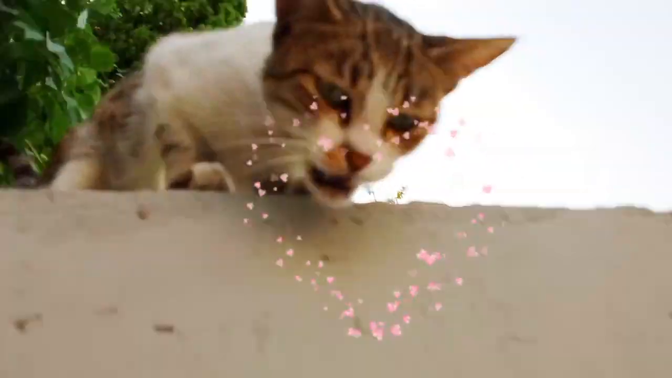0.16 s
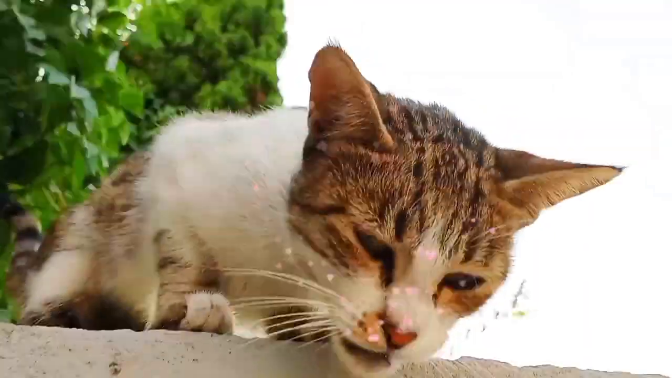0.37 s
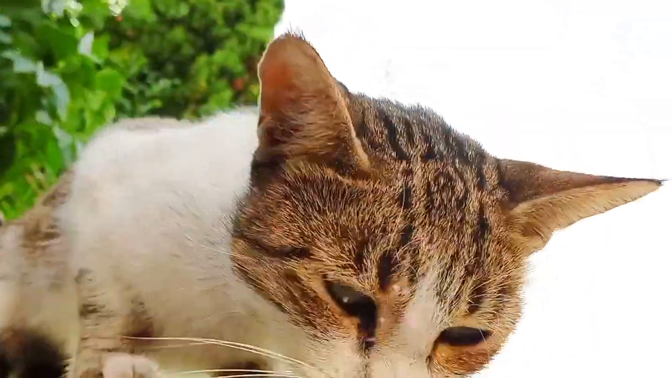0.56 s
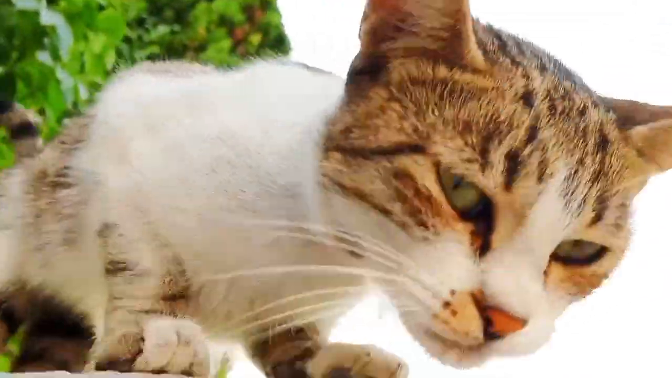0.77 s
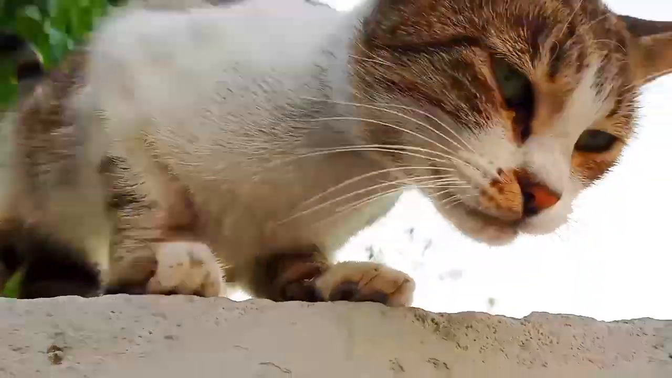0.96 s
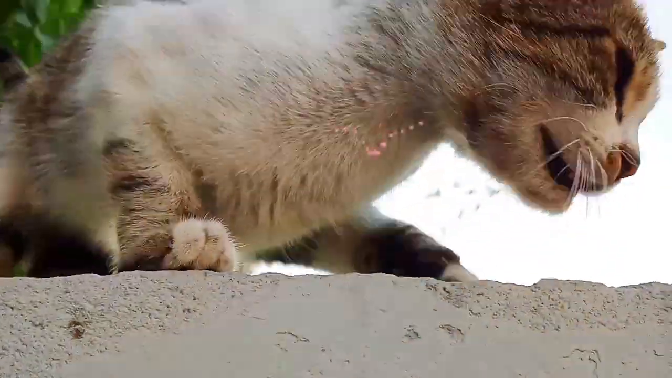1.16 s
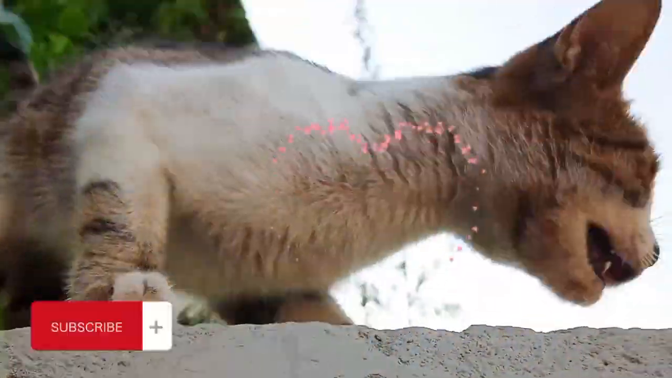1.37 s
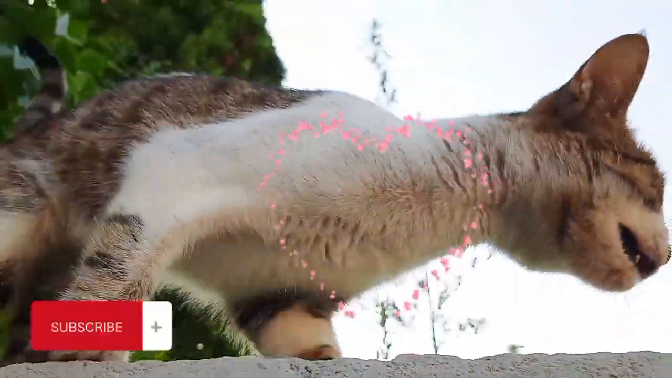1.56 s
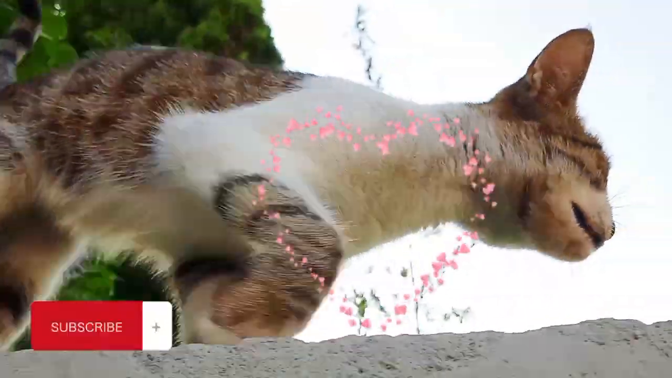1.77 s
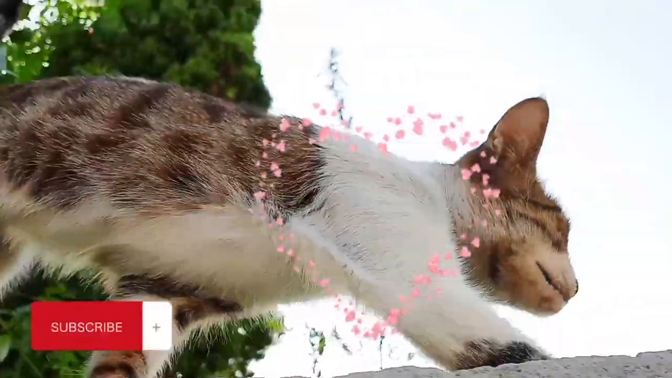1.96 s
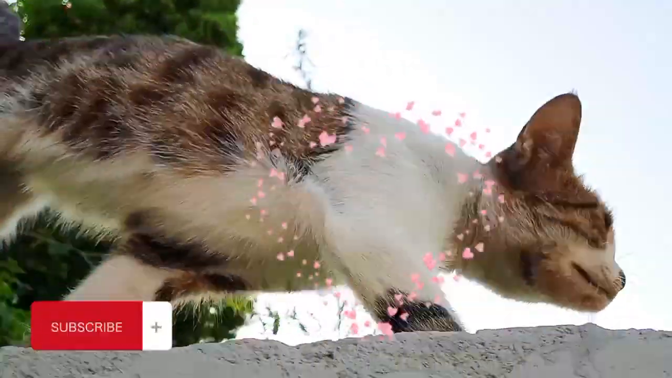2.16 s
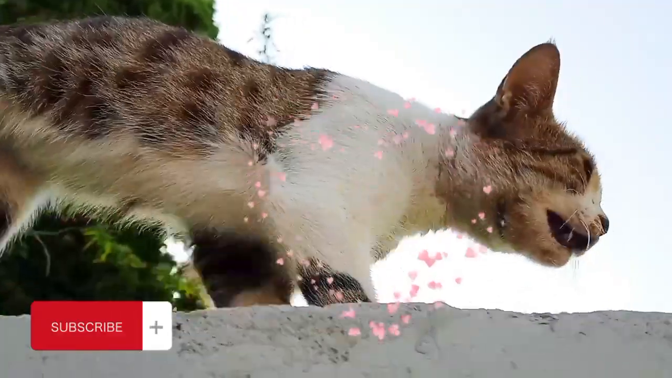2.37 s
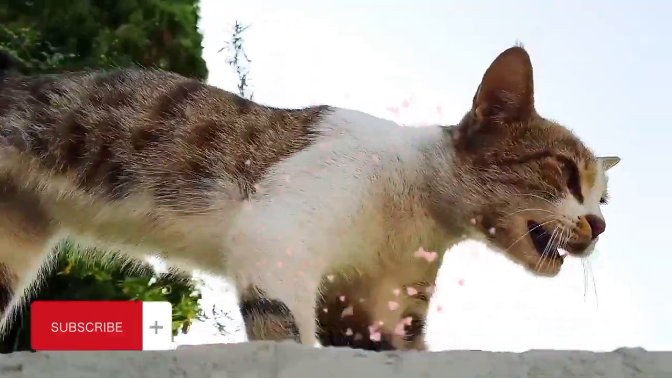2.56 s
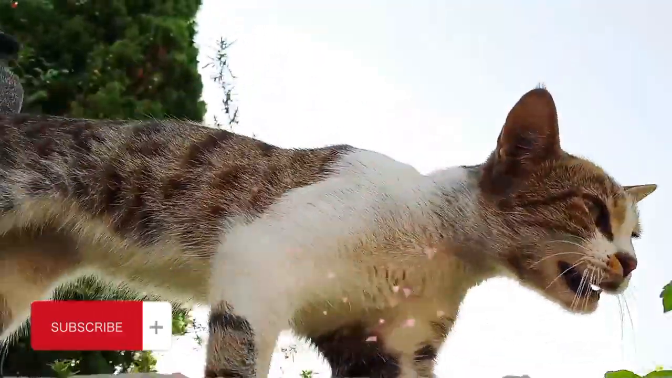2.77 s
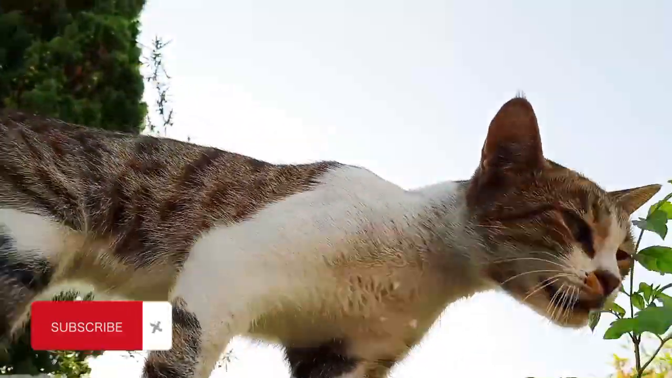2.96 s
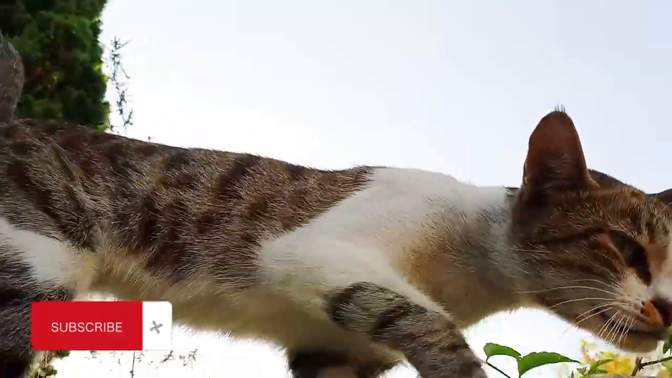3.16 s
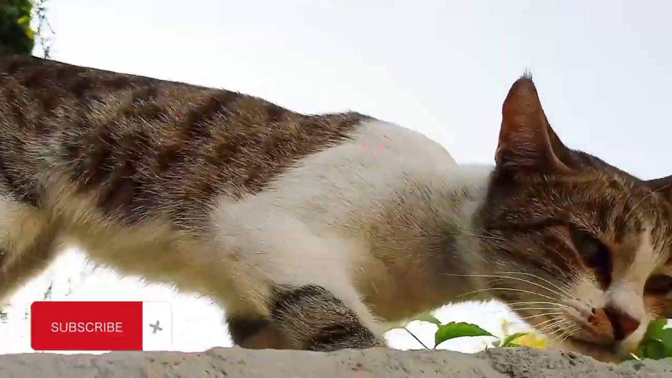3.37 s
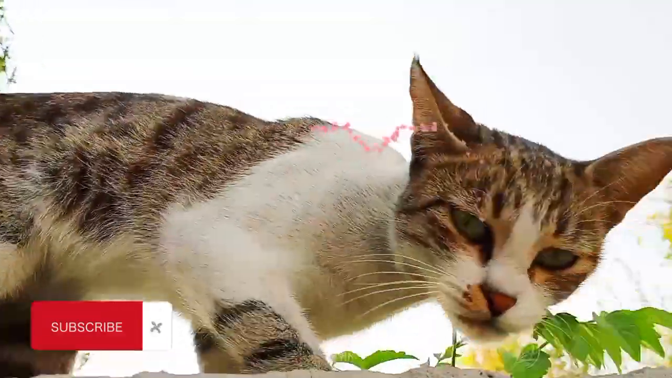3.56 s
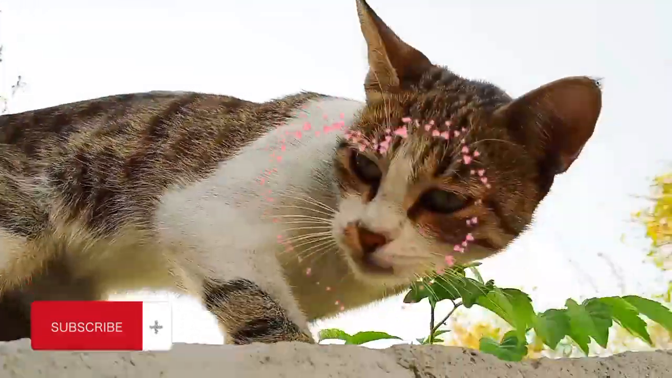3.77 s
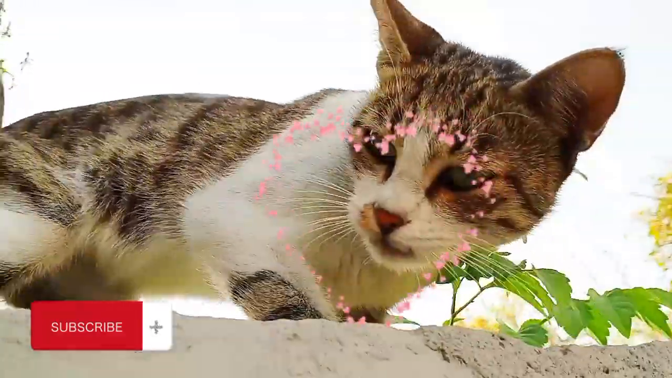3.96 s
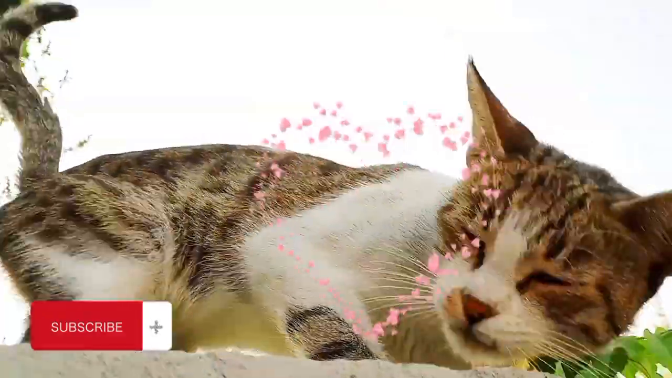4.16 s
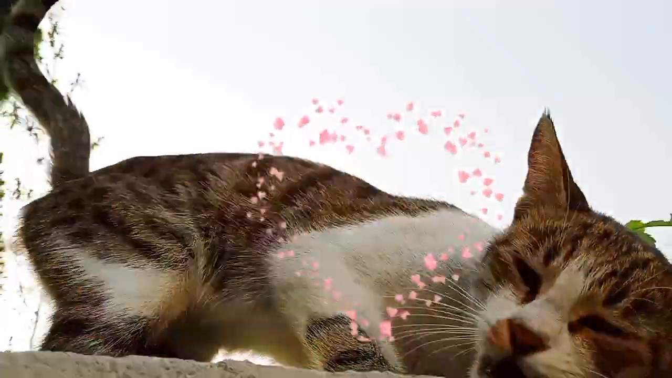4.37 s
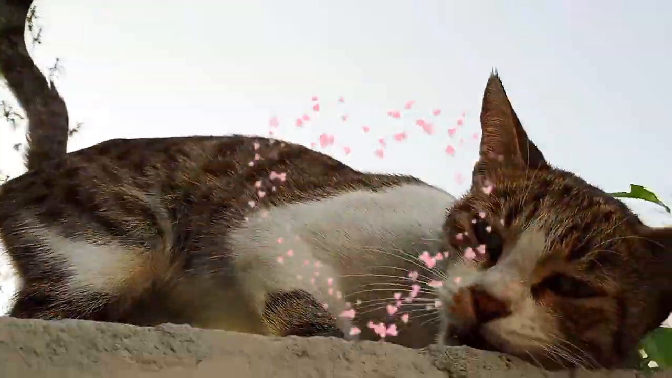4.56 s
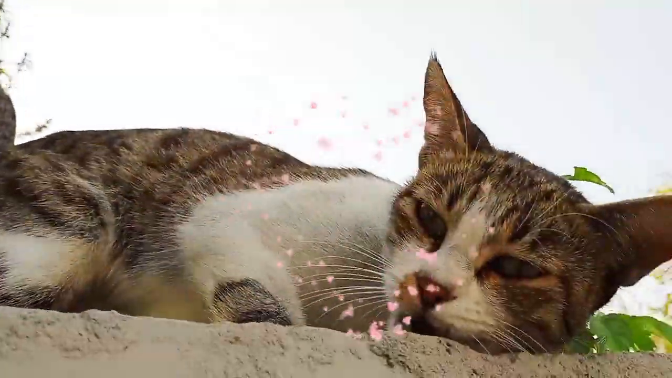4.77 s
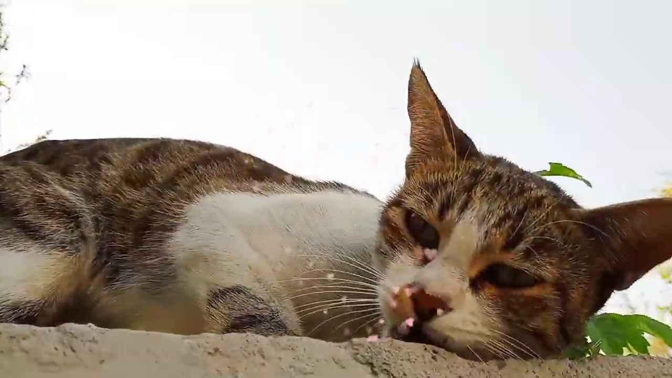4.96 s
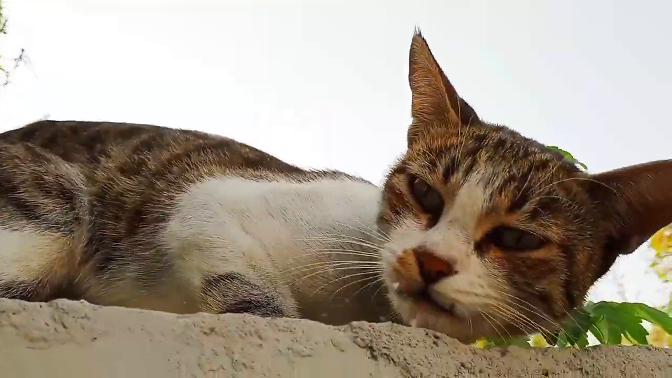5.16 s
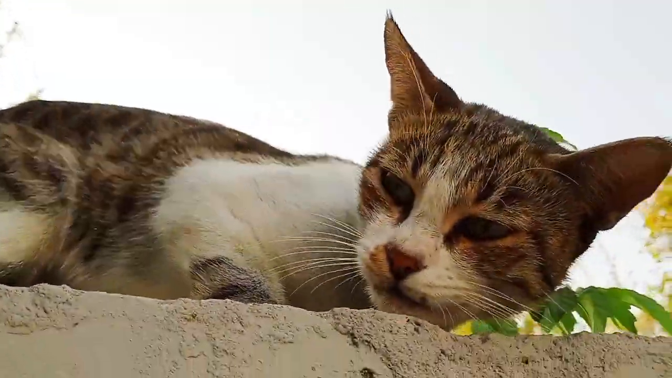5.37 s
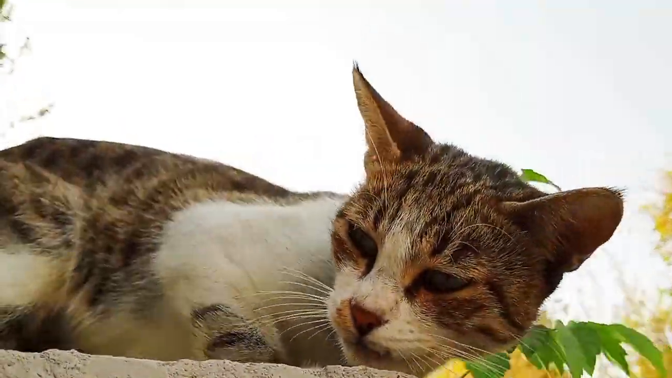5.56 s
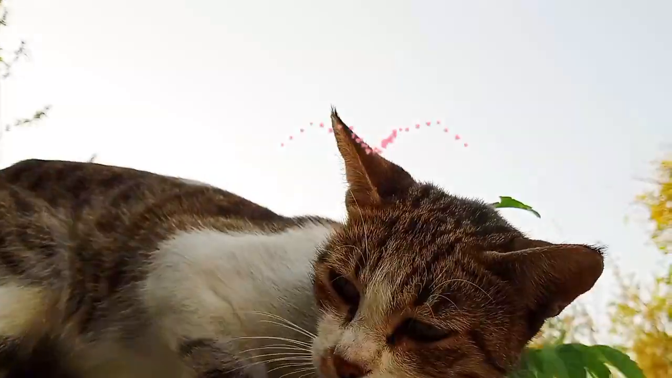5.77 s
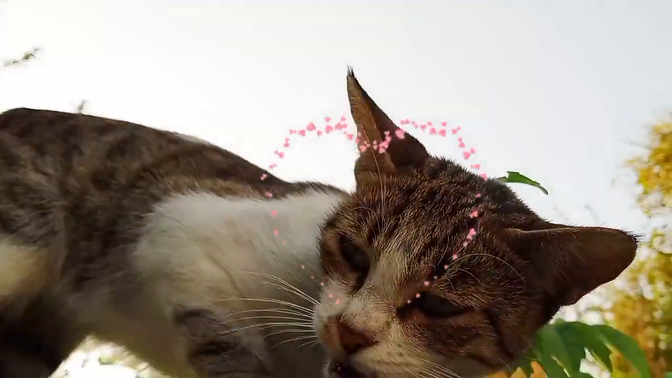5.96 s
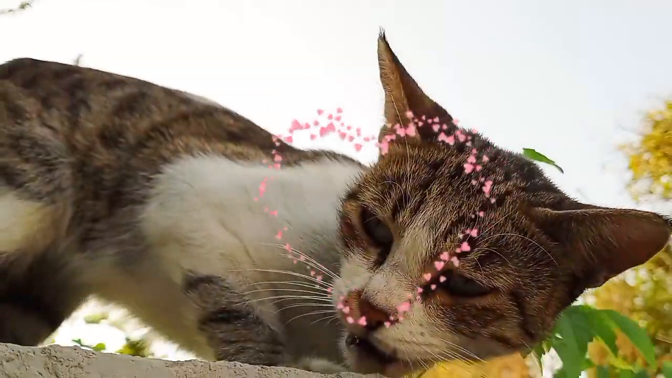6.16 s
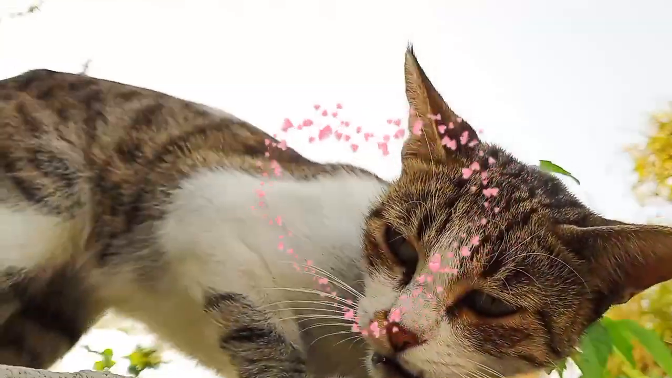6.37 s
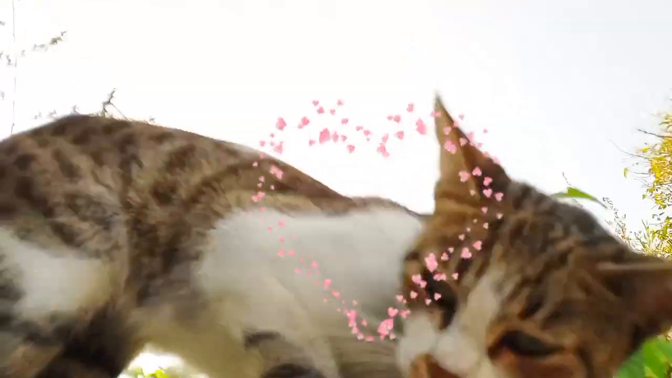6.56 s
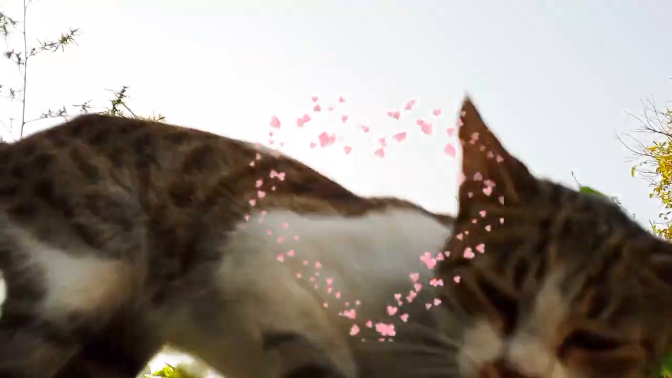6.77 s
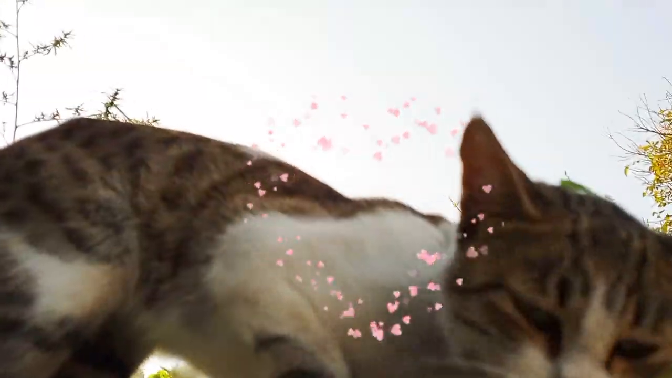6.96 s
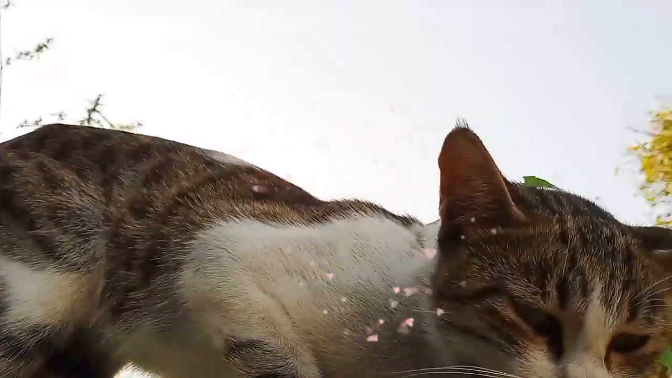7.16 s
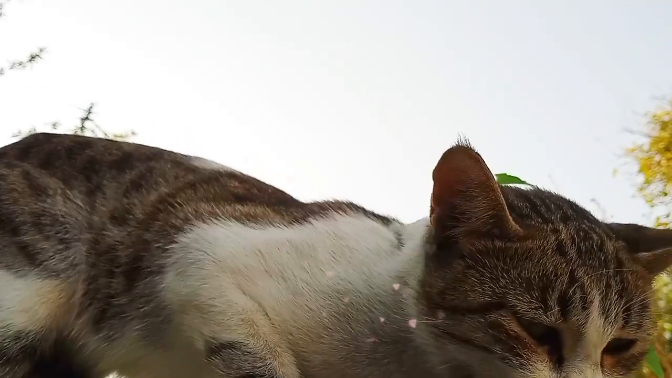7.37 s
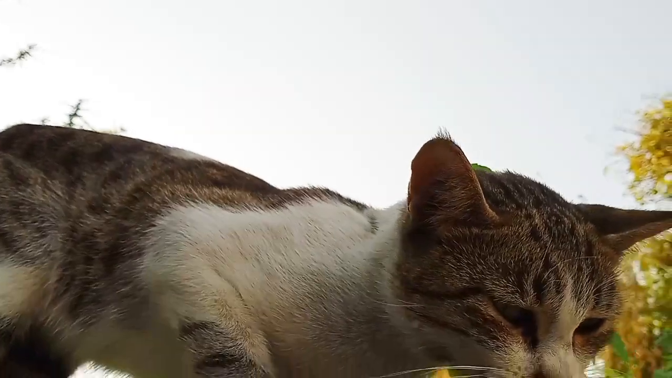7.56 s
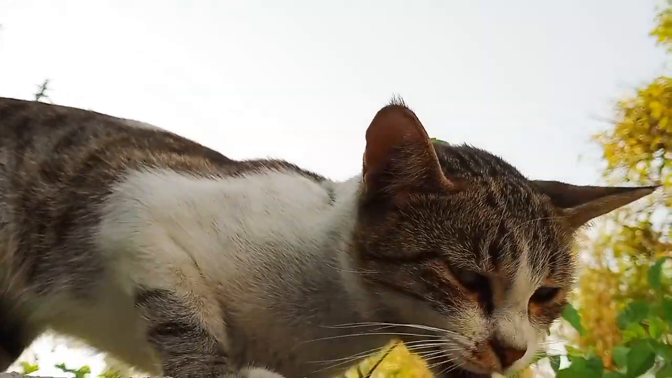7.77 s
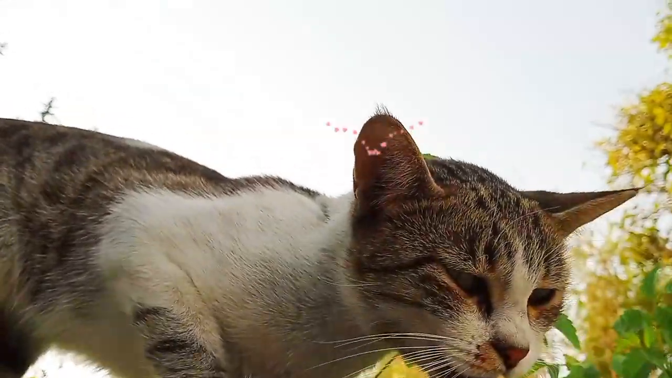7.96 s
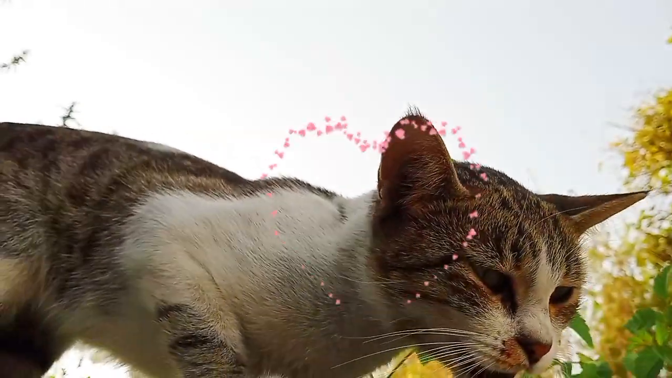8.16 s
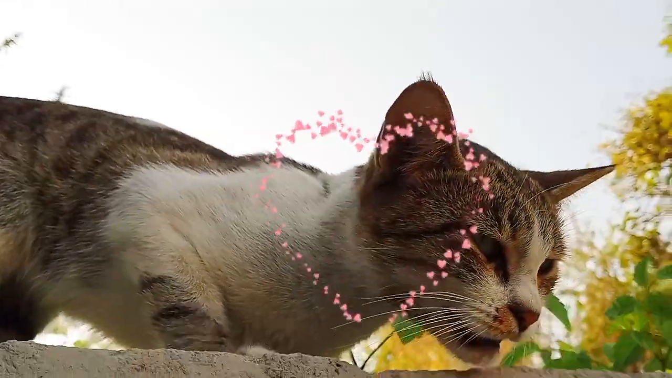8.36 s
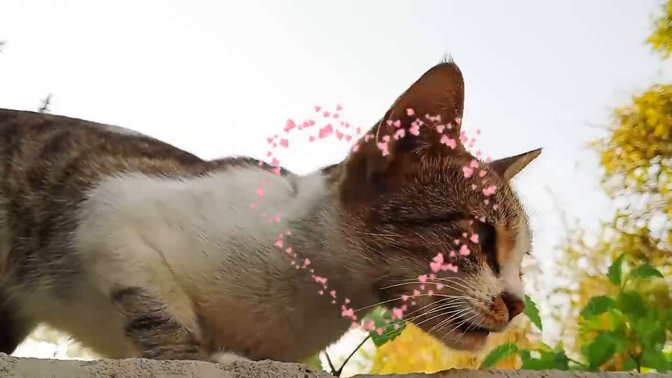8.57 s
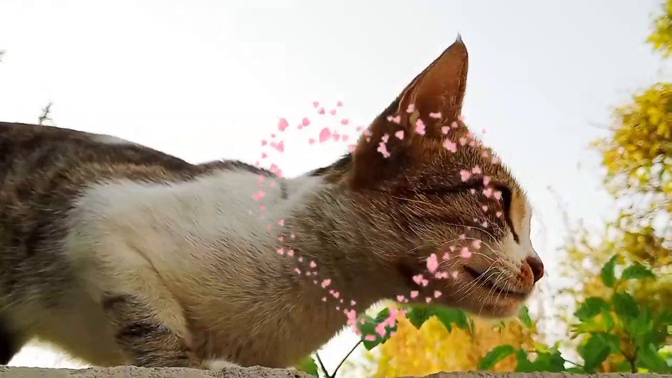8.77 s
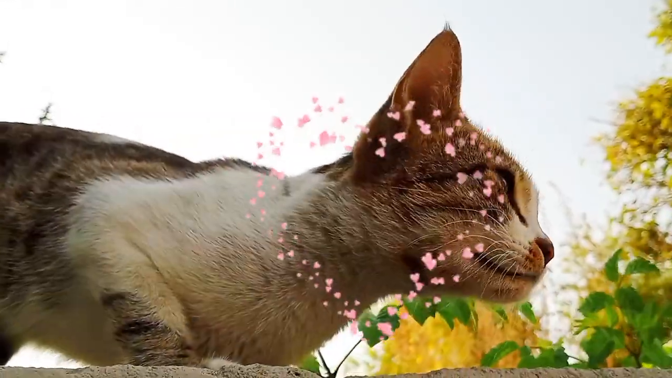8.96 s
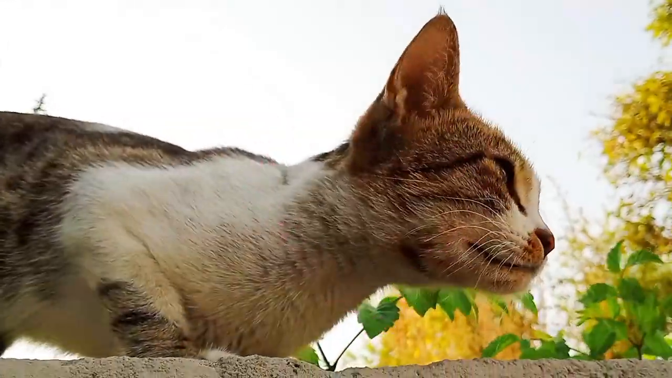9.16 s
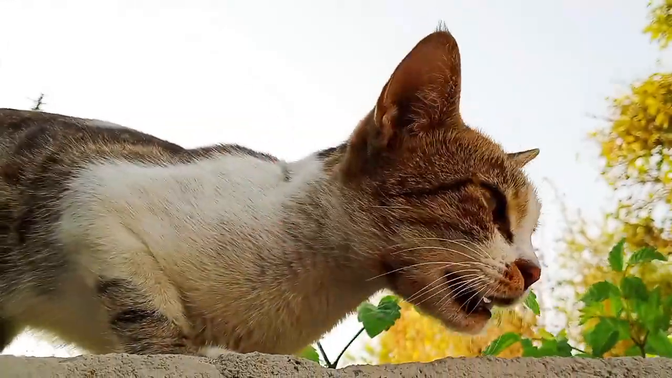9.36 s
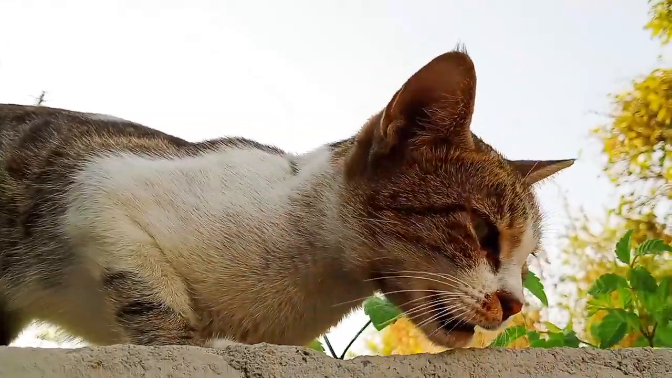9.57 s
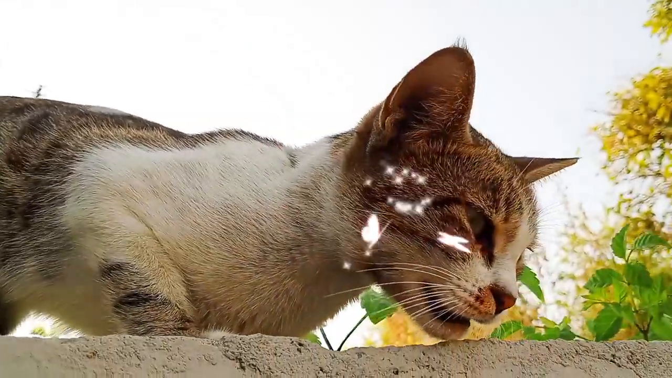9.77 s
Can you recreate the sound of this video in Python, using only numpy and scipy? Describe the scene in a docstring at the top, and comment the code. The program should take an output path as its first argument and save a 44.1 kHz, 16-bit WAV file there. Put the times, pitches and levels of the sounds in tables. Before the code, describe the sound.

A close cat meows seven times outdoors, each whine sagging in pitch, with paw knocks on a wall and a crow cawing behind.

```python
"""Cat and crow in a yard

A near cat meows seven times: a sum of partials shaped by a moving mouth resonance, sagging in pitch and
ending in a small grunt or rasp. A crow caws once faintly and twice loudly: rough pulses through a resonant throat.
Paws knock, tick and scuff on a wall: damped pushes and bursts of filtered noise. A small bird whistles
two falling, nearly pure notes. Filtered noise gives a steady outdoor hiss and a faint hum;
scattered reflections give a light echo."""
import sys
import numpy as np
from scipy import signal
from scipy.fft import rfft, irfft
from scipy.io import wavfile
from scipy.ndimage import uniform_filter1d, minimum_filter1d, map_coordinates

SR = 44100
rng = np.random.default_rng(int(sys.argv[2]) if len(sys.argv) > 2 else 0)


def waveform_to_disk(signal):
    """Save audio, clipped to [-1, 1], as 16-bit WAV at the path in sys.argv[1]."""
    frames = np.transpose(np.atleast_2d(signal))
    scaled = np.clip(frames, -1, 1) * 32767
    samples = np.round(scaled).astype(np.int16)
    wavfile.write(sys.argv[1], SR, samples)


N = 433503

# spectrum of the outdoor air: (frequency [Hz], relative level [dB])
AIR_SPECTRUM = [(15, -55), (25, -25), (94, -7), (148, -9.5), (205, -4), (269, -8), (352, -10.5), (557, -15),
                (604, -14), (729, -14.5), (791, -15.5), (1150, -18.5), (1470, -18.5), (2260, -15),
                (2890, -11.5), (3220, -23.5), (4950, -29), (6310, -11.5), (7220, -15.5), (8270, -46),
                (15800, -34.5)]
# narrow bands in the background: (frequency [Hz], filter width [Hz], relative level [dB])
HUM_BANDS = [(214.6, 8.6, 2), (242.9, 30, -6), (802, 16, -8), (2932, 15.7, -5.5)]

# gesture of each meow; the mouth resonance sinks as the mouth closes:
# (time [s], base pitch [Hz], effort [dB], mouth resonance [Hz], treble level [dB])
MEOW_1 = [(0.0, 575, -25, 1990, 16.5), (0.068, 579, -25, 2020, 12), (0.2, 585, -22.5, 1970, 5.5),
          (0.257, 586, -22.5, 1840, 13), (0.347, 581.5, -20, 1865, 14), (0.421, 569, -29, 1080, 2),
          (0.46, 535, -25, 955, -15), (0.503, 468, -36.5, 1090, -1)]
MEOW_2 = [(1.189, 617, -37, 1660, -22), (1.215, 589, -30, 2120, -11), (1.245, 605, -28.5, 2040, -2),
          (1.343, 610.3, -24.5, 2430, -6.5), (1.382, 582.6, -27.5, 2495, 4.5),
          (1.436, 600.5, -23.5, 2460, -0.5), (1.582, 638, -30, 2000, -7), (1.647, 640, -31.5, 1970, -9),
          (1.758, 595, -32.5, 1640, -13), (1.824, 567, -37, 1010, -4)]
MEOW_3 = [(2.34, 598, -36, 1880, 0), (2.408, 584.4, -33.3, 2210, 7), (2.564, 564, -32, 2146, 15.5),
          (2.607, 571, -31, 2206, 15.5), (2.689, 592, -27.5, 2190, 5), (2.784, 571.4, -29.5, 2160, 1.5),
          (2.813, 578, -34.5, 1210, 10), (2.958, 560, -34.5, 1165, 8), (3.021, 486, -40, 920, -16)]
MEOW_4 = [(4.283, 553, -38, 1100, -20), (4.305, 562, -29.5, 1450, 14), (4.339, 591, -32, 2060, 0),
          (4.439, 601.7, -24.5, 1950, -1), (4.534, 585.5, -24.5, 1910, 6.5), (4.64, 602.3, -22, 1810, -2.5),
          (4.68, 589, -24.5, 1660, -4.5), (4.78, 595, -26, 1490, -12), (4.964, 537, -29, 1160, -2),
          (5.018, 511, -37.5, 1310, 4)]
MEOW_5 = [(5.898, 633, -24, 1810, -7), (5.953, 598, -23.0, 2060, 0), (6.032, 631.4, -26.5, 1965, -0.5),
          (6.138, 606, -23.0, 1810, -10), (6.208, 594.4, -26.5, 1704, -22.5),
          (6.517, 579.3, -28, 1350, -14), (6.763, 511, -32, 950, -7), (7.003, 491, -30, 960, -5.5),
          (7.063, 500, -35, 850, 2)]
MEOW_6 = [(7.801, 600.5, -25, 1890, -6), (7.888, 584.4, -29, 1620, 14), (8.044, 595.8, -23, 1810, 3.5),
          (8.077, 597.3, -17, 1770, 1), (8.098, 582.4, -20.5, 1770, 7.5), (8.191, 589.3, -26, 1740, 2.5),
          (8.256, 586.5, -25, 1580, -3.5), (8.365, 574.7, -28, 1490, 7), (8.504, 543.5, -29, 1260, -3),
          (8.654, 494.5, -37, 920, 2)]
MEOW_7 = [(9.337, 639, -24, 2040, -12), (9.4, 578, -29, 1660, 6), (9.527, 560.7, -26.5, 1770, 8),
          (9.636, 554, -25, 1685, 1.5), (9.701, 551.7, -21.5, 1560, 1), (9.763, 552, -25.5, 1160, 2),
          (9.83, 538, -27.5, 1113, 5)]
# manner of each meow: (opening squeak [share of pitch], final drop [share of pitch],
# open-mouth resonance [dB], fifth partial [dB], brightness [dB])
MEOW_MANNERS = [(0.04, 0.315, 17.5, -10, -16), (0.114, .33, 18.8, 1.5, 0), (0.45, 0.315, 15.4, -6, -11),
                (.06, .38, 17.3, -8.5, -6.5), (0.1026, 0.33, 18.6, 2, -3.5), (0.49, .33, 21.9, -6, -12),
                (0.27, 0, 17.1, -3.5, -6.5)]
# fixed colour of the cat's voice: (frequency [Hz], relative level [dB])
VOICE_COLOUR = [(400, 16.7), (480, 7.4), (600, -4.5), (1150, -.3), (1750, -8.2), (2400, -8), (2950, -19.5),
                (3500, -17), (4100, -20), (4700, -23), (5900, -22), (7000, -26), (8800, -56), (10400, -37),
                (12000, -45)]
# part of the treble level given to a partial: (frequency [Hz], share [0-1])
TREBLE_SHARE = [(1200, 0), (3500, 1)]
# part of the brightness given to a partial: (frequency [Hz], share [0-1])
BRIGHT_SHARE = [(2400, 0), (3500, 1)]
# change of the fundamental, which thins in the second and last meow: (time [s], level [dB])
FUNDAMENTAL_THINNING = [(1.51, 1), (1.555, -16), (1.65, -4), (1.83, 0), (1.9, 0.5), (9.33, 1), (9.45, -4.5),
                        (9.84, 1)]
# quavers of the voice: (middle [s], half length at 1/e [s], depth [share of pitch])
QUAVERS = [(1.26, 0.048, 0.026), (4.335, 0.03, 0.032), (4.92, 0.12, 0.021), (6.81, .09, 0.014)]
# instants when the voice cracks: (time [s], strength [0-1])
VOICE_CRACKS = [(2.352, 0.67), (4.662, 0.94), (6.19, 0.58), (8.191, 0.72)]

# paws landing on the wall: (time [s], level [dB] ahead of the envelopes)
PAW_KNOCKS = [(0.216, -21), (.341, -12), (0.817, -17.5), (1.012, -32), (2.698, -32), (3.129, -31.5)]
# spectrum of a knock: (frequency [Hz], relative level [dB])
KNOCK_SPECTRUM = [(35, -27), (60, 1), (526, 2.5), (835, -3), (1100, -13), (1600, 2), (5430, -24),
                  (6680, -22), (8420, -47), (15000, -26)]
# claws ticking on grit: (time [s], starting level [dB])
CLAW_TICKS = [(0.337, -23), (2.699, -44), (4.172, -44), (4.203, -38), (4.25, -42), (4.294, -35.5),
              (4.35, -48)]
# gritty scuffs: (time [s], length [s], level [dB], fine grit relative to that [dB])
PAW_SCUFFS = [(0.008, 0.24, -37, -3.5), (0.201, 0.24, -29.5, -5), (0.852, 0.18, -36.5, -15),
              (1.822, 0.39, -54, 3.5), (2.673, 0.076, -50, 3), (2.703, 0.0063, -17.5, -21)]
# resonances of a scuff: (frequency [Hz], filter width [Hz], relative level [dB])
SCRAPE_MODES = [(1486, 200, 6.5), (2300, 1440, 2)]
# resonances of fine grit: (frequency [Hz], filter width [Hz], relative level [dB])
GRIT_MODES = [(3800, 480, 9.5), (5570, 1300, 0), (11400, 1300, -4), (15100, 1500, -7)]

# rasps of air as a meow breaks off: (time [s], level [dB] ahead of the envelope)
RASPS = [(0.48, -21), (3.0, -36.5), (7.04, -24.5), (8.638, -24)]
# resonances of the nearly shut mouth: (frequency [Hz], filter width [Hz], relative level [dB])
SHUT_MOUTH_MODES = [(2560, 510, 0.5), (4550, 190, -4), (6330, 670, -0.5), (10630, 210, -12.5)]
# caws: (start [s], length [s], rise [s], top pitch [Hz], starting level [dB], base roughness [0-1])
CAWS = [(3.342, 0.27, 0.093, 380, -39, 0.5), (4.961, 0.32, 0.031, 385, -15.5, 0.4),
        (9.404, .36, 0.049, 376.7, -17.5, 0.51)]
# the crow's throat at the middle pitch: (frequency [Hz], filter width [Hz], relative level [dB])
CROW_THROAT_MODES = [(1424, 145, 4), (1980, 380, 3), (2340, 40, -15.5), (3990, 490, -11.5),
                     (4360, 870, -10), (5770, 1000, -9.5), (6760, 380, -7.5), (11700, 5900, -28)]
# faint whistles: (start [s], length [s], first pitch [Hz], last pitch [Hz], peak level [dB])
WHISTLES = [(7.252, 0.066, 3510, 3450, -51.5), (7.297, 0.1, 4520, 4000, -49)]


def gain_of(db):
    """Amplitude ratio: twenty decibels are a factor of ten."""
    return np.exp(np.asarray(db) * (np.log(10) / 20))


def evened(x):
    """Normalization: scales a signal to rms 1."""
    return x / np.sqrt(np.mean(x ** 2) + 1e-20)


def read(points, hz):
    """Interpolation of a curve along a logarithmic frequency axis."""
    f, value = np.transpose(points)
    return np.interp(np.log(hz + 1), np.log(f), value)


def curves(rows):
    """Linear interpolation in time: one array for each column after the first."""
    s, *columns = np.transpose(rows)
    t = np.arange(s[0], s[-1], 1 / SR)
    return [np.interp(t, s, column) for column in columns]


def add(mix, s, sound):
    """Superposition: adds a sound to the mix at time s."""
    part = mix[max(round(s * SR), 0):][:len(sound)]
    part += sound[:len(part)]


def noise(size):
    """White noise: independent Gaussian samples."""
    return rng.standard_normal(max(size, 2 * SR))[:size]


def waver(size, rate_hz):
    """Low-pass noise: smooth chance movement, scaled to rms 1."""
    lowpass = signal.butter(2, rate_hz, fs=SR, output="sos")
    return evened(signal.sosfilt(lowpass, noise(max(size, 2 * SR))))[:size]


def coloured(points):
    """Spectral shaping: noise of rms 1 with the given spectrum."""
    gains = gain_of(read(points, np.fft.rfftfreq(2 * N, 1 / SR)))
    return evened(irfft(rfft(noise(N), 2 * N) * gains, 2 * N)[:N])


def ring(x, modes):
    """Resonance: parallel peak filters, each passed twice; rms 1."""
    out = 0
    for hz, width, db in modes:
        b, a = signal.iirpeak(min(hz, .45 * SR), hz / width, SR)
        once = signal.lfilter(b, a, x)
        out = out + gain_of(db) * signal.lfilter(b, a, once)
    return evened(out)


def background(air_db=-39, hum_db=-46, flutter_db=1.5, swell_db=1):
    """Amplitude-modulated noise: the air's low part swells, its hiss flutters, and narrow bands hum."""
    air = gain_of(air_db) * coloured(AIR_SPECTRUM)
    hiss = signal.sosfiltfilt(signal.butter(4, 5000, "high", fs=SR, output="sos"), air)
    low = (air - hiss) * gain_of(-0.5 + swell_db * waver(N, rate_hz=11.0))
    fluttering = hiss * gain_of(flutter_db * waver(N, rate_hz=55))
    return low + fluttering + gain_of(hum_db) * ring(noise(N), HUM_BANDS)


def peak_db(hz, centre_hz, width_hz, lift):
    """Resonance curve: the boost of a partial at hz; lift is the power added at the centre."""
    return 10 * np.log10(1 + lift / (1 + (2 * (hz - centre_hz) / width_hz) ** 2))


def partial_levels(partials, effort_db, mouth_hz, treble_db, mouth_db, fifth_db, bright_db, now, t, left):
    """Source and filter: the level in dB of each partial after the voice's colour and the mouth."""
    treble = read(TREBLE_SHARE, partials)
    levels = effort_db + read(VOICE_COLOUR, partials) + treble_db * treble
    levels += bright_db * read(BRIGHT_SHARE, partials)
    # a resonance that moves fast is smeared, and one below its open position is weaker
    steady = 1 / (1 + (np.gradient(mouth_hz) * SR / 8900) ** 2)  # 8900 Hz per s halves its power
    openness = mouth_hz / 2046  # open position [Hz]
    mouth_lift = steady * gain_of(mouth_db) ** 2 * openness ** 3.02
    upper_lift = steady * gain_of(13) ** 2 * openness ** 1.5
    levels += peak_db(partials, mouth_hz, width_hz=99, lift=mouth_lift)
    levels += peak_db(partials, mouth_hz + 1377, width_hz=260, lift=upper_lift)
    levels[0] += np.interp(now, *np.transpose(FUNDAMENTAL_THINNING), left=0, right=0)
    levels[4] += fifth_db
    # the treble comes in late as the mouth opens
    levels += -9 * np.exp(-t / 0.029) * treble
    # the overtones fade as it shuts, favouring the fundamental in the grunt
    levels[1:] += -4 * np.exp(-left / 0.036)
    return levels


def meow(rows, squeak, drop, mouth_db, fifth_db, bright_db,
         jitter=0.003, shimmer_db=0.8, air_db=-36, onset_db=-11):
    """Additive synthesis: twenty harmonics, lifted near the moving mouth resonance, with pulsing air."""
    hz, effort_db, mouth_hz, treble_db = curves(rows)
    size = len(hz)
    t = np.arange(size) / SR
    now, left = rows[0][0] + t, t[::-1]
    hz = hz * (1 + squeak * np.exp(-t / .0095)) * (1 - drop * np.exp(-left / .0172))
    quaver_depth = sum(share * np.exp(-((now - s) / half) ** 2) for s, half, share in QUAVERS)
    quaver = quaver_depth * np.sin(2 * np.pi * 26.8 * t)
    # at the start and in a crack the folds beat unevenly and leak more air
    cracks = sum(strength * np.exp(-((now - s) / 0.0026) ** 2) for s, strength in VOICE_CRACKS)
    unsettled = np.exp(-t / 0.022) + cracks
    unevenness = jitter * waver(size, rate_hz=45) + .025 * unsettled * waver(size, rate_hz=200)
    hz = hz * (1 + quaver + unevenness)
    phase = 2 * np.pi * np.cumsum(hz) / SR
    partials = np.arange(1, 21)[:, None] * hz
    levels = partial_levels(partials, effort_db, mouth_hz, treble_db,
                            mouth_db, fifth_db, bright_db, now, t, left)
    voice = 0
    for k, db in enumerate(levels, 1):
        # fixed resonances turn back the phase of what lies above them
        lag = np.arctan((k * hz - 1300) / 350) + np.arctan((k * hz - 2300) / 350)
        shimmer = shimmer_db * np.sqrt(k) * waver(size, rate_hz=19.6)  # higher partials are less steady
        voice = voice + np.sqrt(2) * gain_of(db + shimmer) * np.cos(k * phase - lag)
    # air leaks through the folds once a cycle
    leak = noise(size) * (1 + np.cos(phase))
    air = ring(leak, [(1240, 270, -7.5), (1960, 340, -0.5), (3470, 1700, -12.5)])
    air_gain = gain_of(air_db) + unsettled * gain_of(onset_db)
    voice = voice + air_gain * air * np.linalg.norm(gain_of(levels[:5]), axis=0)
    return voice * np.minimum(t / 0.001, 1) * np.minimum(left / 0.0089, 1)


def yard(x, t60, dull_hz, delay):
    """Reverberation: convolution with sparse, decaying reflections whose treble dies sooner."""
    t = np.arange(SR) / SR
    taps = noise(SR) * (rng.random(SR) < 2000 / SR) * (t > delay)  # about 2000 reflections per s
    low = signal.sosfilt(signal.butter(2, dull_hz, fs=SR, output="sos"), taps)
    tail = low * gain_of(-60 * t / t60) + .5 * (taps - low) * gain_of(-120 * t / t60)
    return signal.fftconvolve(x, tail / np.linalg.norm(tail))[:N]


def paws(knock_rise=0.0019, knock_decay=0.013, push_hz=310, push_decay=0.0046, push_db=3,
         tick_decay=0.0073, clump_db=4):
    """Impact and friction: damped pushes with noise thuds, claw ticks and clumped scuffing grains."""
    out, t = np.zeros(N), np.arange(SR // 10) / SR
    thud, grit = coloured(KNOCK_SPECTRUM), ring(noise(N), GRIT_MODES[1:])
    push = -gain_of(push_db) * np.sin(2 * np.pi * push_hz * t) * np.exp(-t / push_decay)
    knock_shape = (1 - np.exp(-t / knock_rise)) * np.exp(-t / knock_decay)
    knocking, ticking = np.zeros((2, N))
    for s, db in PAW_KNOCKS:
        add(out, s, gain_of(db) * push)
        add(knocking, s, gain_of(db) * knock_shape)
    for s, db in CLAW_TICKS:
        add(ticking, s, gain_of(db) * np.exp(-t / tick_decay))
    for s, length, db, grit_db in PAW_SCUFFS:
        size = int(length * SR)
        grains = noise(size) * gain_of(clump_db * waver(size, rate_hz=340))
        scuff = ring(grains, SCRAPE_MODES) + gain_of(grit_db) * ring(grains, GRIT_MODES)
        add(out, s, gain_of(db) * scuff * signal.windows.tukey(size, .7))
    return out + knocking * thud + ticking * grit


def rasp(db, rise=0.003, decay=0.023):
    """Resonant turbulence: the last air of a meow rattles through the nearly shut mouth."""
    t = np.arange(SR // 5) / SR
    puffs = noise(len(t)) * gain_of(1.8 * waver(len(t), rate_hz=130))
    shape = (1 - np.exp(-t / rise)) * np.exp(-t / decay)
    return gain_of(db) * ring(puffs, SHUT_MOUTH_MODES) * shape


def caw(length, rise, top_hz, level_db, roughness, middle_hz=380, uneven_db=1.0, croak=0.13):
    """Time warping: pulses and puffs ring the throat, then pitch and resonances bend together."""
    arch, fade_db, release_s = .19, -10, 0.09
    t = np.arange(0, length, 1 / SR)
    along = t / length
    hz = top_hz * (1 - arch + arch * np.sin(np.pi * along ** .75))
    db = level_db + fade_db * along
    rough = roughness + 0.3 * np.exp((t - length) / release_s)  # hoarse as it ends
    clock = np.cumsum(hz / middle_hz)  # reading position: slower reading lowers pitch and throat
    rough = np.clip(np.interp(np.arange(SR), clock, rough), 0, 1)
    turns = np.cumsum(middle_hz * (1 + .008 * waver(SR, rate_hz=150))) / SR
    pulses = sum(np.cos(2 * np.pi * k * turns) for k in range(1, 11))  # the top of the call is all rasp
    puffs = noise(SR) * (.15 + np.exp(-(turns % 1) / .3))
    drive = (1 - rough) * evened(pulses) + 2 * rough * evened(puffs)
    drive = drive * gain_of(uneven_db * waver(SR, rate_hz=300))
    # every third pulse is stronger: the croak
    drive = drive * (1 + croak * np.cos(2 * np.pi * turns / 3))
    voice = map_coordinates(ring(drive, CROW_THROAT_MODES), [clock])
    shape = np.minimum(t / rise, 1) ** 2 * np.minimum((length - t) / release_s, 1)
    return gain_of(db) * voice * shape


def whistle(length, first_hz, last_hz, db):
    """Frequency glide: one soft, falling sine whose phase is the sum of its frequency."""
    hz = np.linspace(first_hz, last_hz, int(length * SR))
    tone = np.sin(2 * np.pi * np.cumsum(hz) / SR)
    return gain_of(db) * tone * signal.windows.tukey(len(hz), .5)


def scene():
    """Direct-to-reverberant ratio: the near cat is almost dry; the farther birds are wetter."""
    cat, birds = np.zeros((2, N))
    gestures = (MEOW_1, MEOW_2, MEOW_3, MEOW_4, MEOW_5, MEOW_6, MEOW_7)
    for rows, manner in zip(gestures, MEOW_MANNERS):
        add(cat, rows[0][0], meow(rows, *manner))
    for s, db in RASPS:
        add(cat, s, rasp(db))
    for s, *call in CAWS:
        add(birds, s, caw(*call))
    for s, *note in WHISTLES:
        add(birds, s, whistle(*note))
    near = cat + paws()
    near = near + gain_of(-24.5) * yard(near, t60=0.42, dull_hz=3600, delay=.004)
    birds = birds + gain_of(-8.5) * yard(birds, t60=0.67, dull_hz=2940, delay=.01)
    return (near + birds + background())[None]


def record(dry):
    """Band and peak limiting: the microphone's bass cut, a quick limiter and a treble cutoff."""
    thin = signal.sosfilt(signal.butter(2, 42, "high", fs=SR, output="sos"), dry)
    ceiling = .87
    limit = minimum_filter1d(ceiling / np.maximum(abs(thin), ceiling), size=600)
    limited = thin * uniform_filter1d(limit, size=600)
    lowpass = signal.firwin(511, 15850, window=("kaiser", 9), fs=SR)
    return signal.oaconvolve(limited, lowpass[None], "same")


dry = scene()
out = record(dry)
waveform_to_disk(out)
```